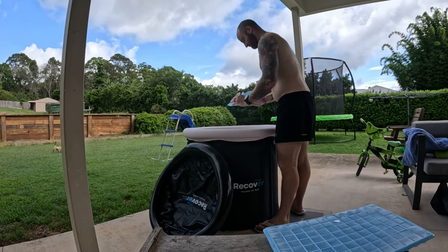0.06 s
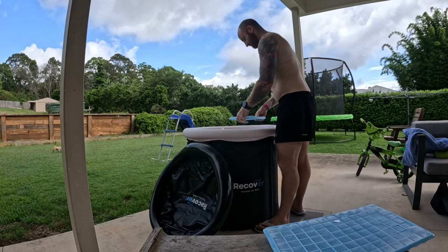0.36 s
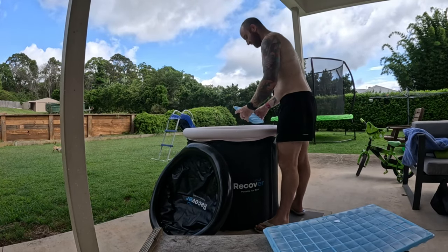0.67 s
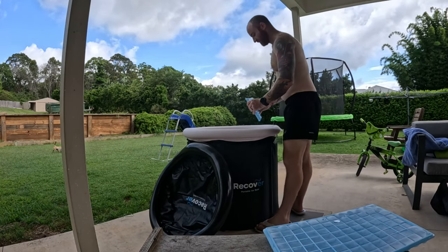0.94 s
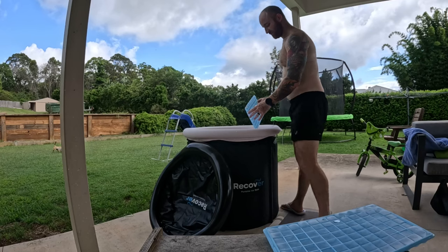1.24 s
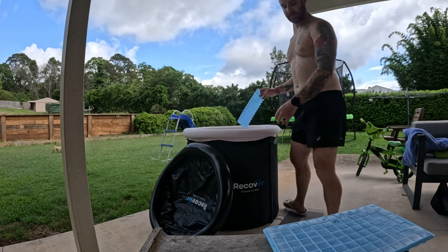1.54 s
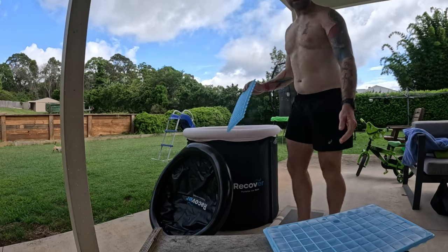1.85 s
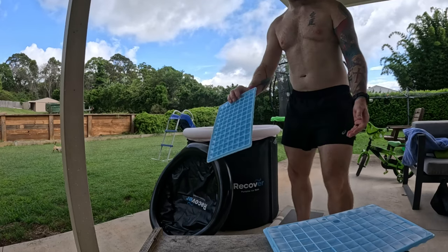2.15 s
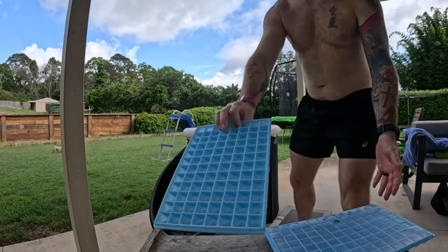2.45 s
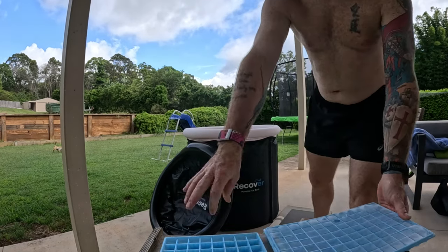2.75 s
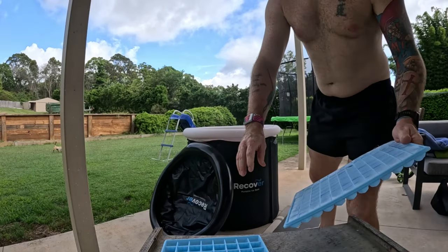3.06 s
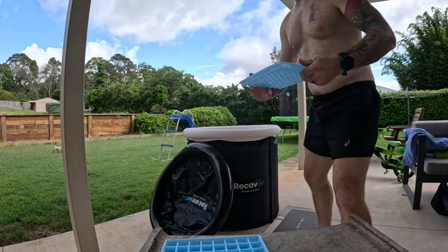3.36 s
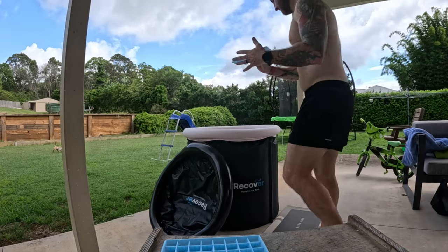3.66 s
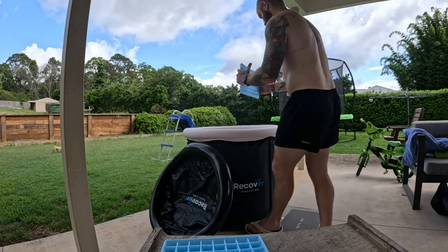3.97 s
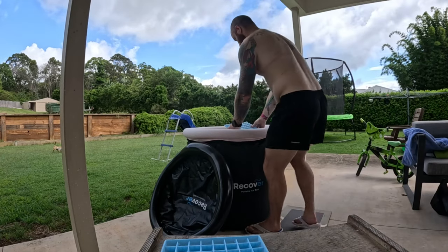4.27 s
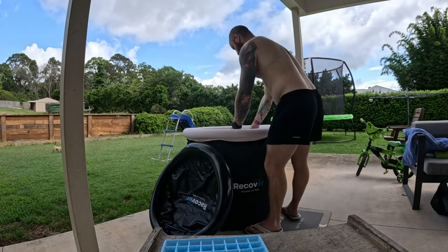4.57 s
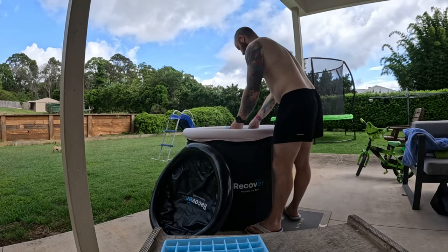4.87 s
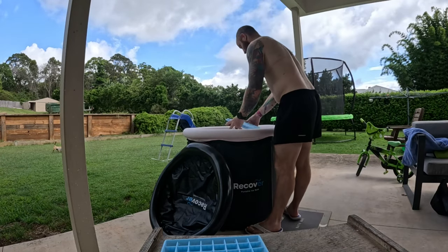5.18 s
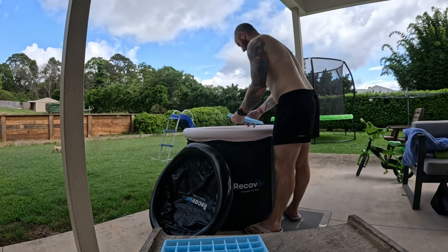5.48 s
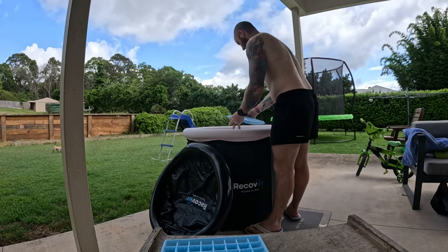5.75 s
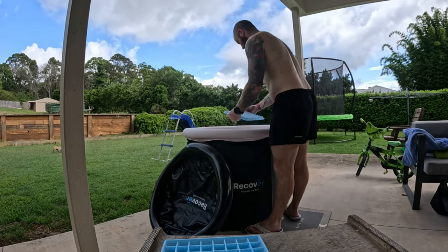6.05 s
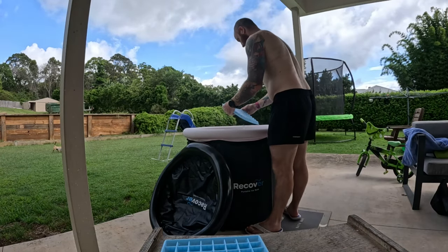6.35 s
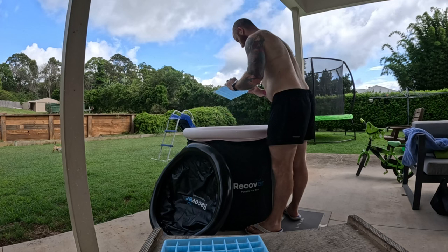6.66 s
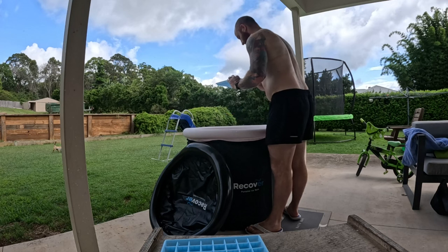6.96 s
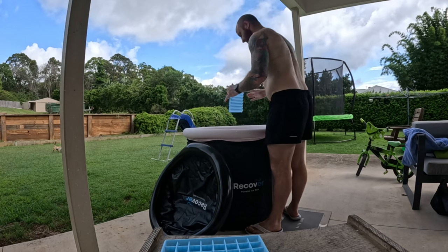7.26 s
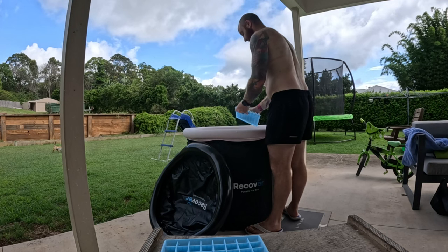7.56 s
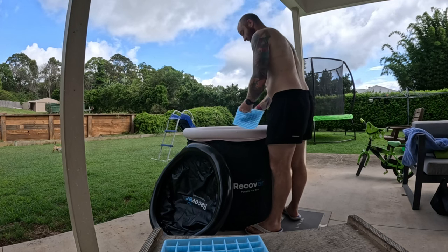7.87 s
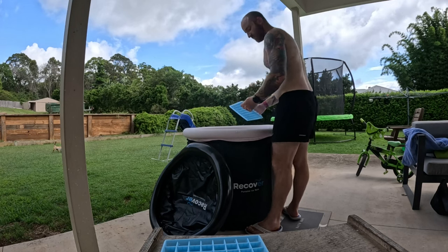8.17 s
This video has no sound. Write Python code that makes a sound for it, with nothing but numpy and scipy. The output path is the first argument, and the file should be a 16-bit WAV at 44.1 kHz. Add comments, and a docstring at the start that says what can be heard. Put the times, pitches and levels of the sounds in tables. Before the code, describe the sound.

Ice cubes crack from flexed trays and splash into a tub, with one loud close tray slap, buzzing cicadas and a single woof.

```python
"""Ice cubes into a tub on the patio

Rubbery trays are twisted until cubes crack loose and splash into a tub of water under a patio roof.
Cicadas buzz in the garden, far engines drone, soft steps pass and a dog woofs once. An empty tray is
slapped on the bench that carries the microphones, and the blow makes their gain control turn
everything down for a moment. Near the end a tray thumps the tub twice."""
import sys
import numpy as np
from scipy import signal
from scipy.fft import rfft, irfft, next_fast_len
from scipy.io import wavfile
from scipy.ndimage import uniform_filter1d

SR = 44100
rng = np.random.default_rng(int(sys.argv[2]) if len(sys.argv) > 2 else 0)


def unload_wav(signal):
    """Save mono or channel-first audio to the path in sys.argv[1] as 16-bit WAV at rate SR, clipped to [-1, 1]."""
    wavfile.write(
        sys.argv[1],
        SR,
        np.round(np.clip(np.atleast_2d(signal).T, -1, 1) * 32767).astype(np.int16),
    )


N = 366912
TIME = np.arange(N) / SR  # seconds into the scene
T = np.arange(32768) / SR  # seconds into one short sound


def amp(db):
    """Turns decibels into a gain."""
    return 10 ** (np.asarray(db) / 20)


def unit_rms(x):
    """Scales a signal to an average power of 1."""
    return x / np.sqrt(np.mean(x ** 2) + 1e-20)


def read(points, hz):
    """Reads between the rows of a frequency table, on a log-frequency axis."""
    f, value = np.transpose(points)
    return np.interp(np.log(hz + 1), np.log(f + 1), value)


def blend(a, b, share):
    """Mixes two sets of settings, from a at share 0 to b at share 1."""
    return [x + (y - x) * np.clip(share, 0, 1) for x, y in zip(a, b)]


def add(mix, s, sound):
    """Mixes a sound in at s seconds."""
    part = mix[max(round(s * SR), 0):][:len(sound)]
    part += sound[:len(part)]


def colour(x, spectrum, bass_db=0, treble_db=0):
    """Filters a sound by a spectrum, with bass and treble controls."""
    size = 2 * next_fast_len(len(x) // 2 + 2048)
    hz = abs(np.fft.fftfreq(size, 1 / SR))
    tilt = [(400, bass_db), (1300, 0), (2000, 0), (6000, treble_db)]
    log_gain = np.log(amp(read(spectrum, hz) + read(tilt, hz)))
    response = np.exp(np.conj(signal.hilbert(log_gain)))[:size // 2 + 1]  # rings only after a hit
    return irfft(rfft(x, size) * response, size)[:len(x)]


def hollowed(spectrum, centre_hz, peak_db, octaves):
    """Adds the hollow note of the struck spot to an object's spectrum."""
    hz = np.geomspace(30, 16000, num=240)
    peak = peak_db / (1 + (np.log2(hz / centre_hz) / octaves) ** 2)
    return np.column_stack([hz, read(spectrum, hz) + peak])


def burst(spectrum, decay, bass_db, treble_db, rise=0.00042, grain_db=3.0):
    """A dying swarm of tiny, uneven hits, coloured by the object they shake."""
    shape = np.minimum(T / rise, 1) * np.exp(-np.maximum(T - rise, 0) / decay)
    hits = rng.standard_normal(len(T)) * amp(grain_db * np.minimum(rng.exponential(1, len(T)), 6))
    heard = T < rise + 10 * decay + 0.05
    sound = unit_rms(colour((hits * shape)[heard], spectrum, bass_db, treble_db))
    sound *= np.sqrt(np.mean(shape[heard] ** 2))
    return np.pad(sound, (0, len(T) - len(sound)))


def ring(notes):
    """The notes of a struck object; each fades by 60 dB in its ring time, t60."""
    tones = sum(amp(db - 60 * T / t60) * np.sin(2 * np.pi * hz * T) for hz, db, t60 in notes)
    return tones * (1 - np.exp(-T / 0.0013))


# echoes off the roof, floor and wall: delay/s, level/dB
ECHOES = [(0.0102, -4), (.0186, -7.5), (.025, -10.5)]
# how long the patio rings: f/Hz, ring time/s
PATIO_RING = [(150, 0.54), (400, 0.4), (900, 0.57), (2000, 0.52), (5000, 0.42), (12000, 0.13)]


def patio(x, echo_db, tail_db, lean_db):
    """Adds hard echoes and a soft tail that differs in each ear; lean_db favours the left."""
    count = len(T) // 16
    taps = np.zeros((2, len(T)))
    places = np.arange(count) * 16 + rng.integers(0, 16, (2, count))
    np.put_along_axis(taps, places, rng.choice([-1., 1.], (2, count)), 1)
    taps = (taps + 0.27 * taps[::-1]) * np.minimum(T / 0.002, 1)
    hz, t, bands = signal.stft(taps, SR, nperseg=256)
    tail = signal.istft(bands * amp(-60 * t / read(PATIO_RING, hz)[:, None]), SR, nperseg=256)[1]
    response = amp(tail_db) * tail / np.linalg.norm(tail[0])
    response[:, 0] += 1  # the direct sound
    for s, db in ECHOES:
        response[:, round(s * SR)] += amp(db + echo_db)
    return signal.oaconvolve(x[None], response, axes=1)[:, :N] * amp([[lean_db / 2], [-lean_db / 2]])


# tone of the garden: f/Hz, level/dB
GARDEN_TONE = [(15, 9.5), (35, -3), (60, 5), (100, -8), (170, -2), (300, -15), (600, -28.5), (1000, -24.5),
               (1500, -21), (2100, -12), (2900, -16), (4000, -10), (6000, -15.5), (7000, -11), (7800, -2.5),
               (9300, -20), (11000, -32), (12200, -29.5), (14500, -51)]
# how alike the two ears are: f/Hz, likeness/0-1
LIKENESS = [(60, 1.0), (150, 0.95), (380, 0.5), (950, 0.54), (2380, 0.63), (5980, 0.83), (15000, 0.34)]
# how much louder the left is: f/Hz, level/dB
LEFT_LEAN = [(60, 0.5), (150, -2), (380, -3), (950, 0.5), (2380, 2.0), (5980, 2.5), (15000, 3.5)]


def garden(level_db=-36, rumble_swing_db=2.5, hiss_swing_db=1.84):
    """A lumpy low rumble and the hiss of many far insects."""
    frames, hz = N // 512 + 5, np.fft.rfftfreq(2048, 1 / SR)
    a, b, c, d, patches = rng.standard_normal((frames, len(hz), 5)).T
    patches = unit_rms(uniform_filter1d(uniform_filter1d(patches, size=16, axis=0), size=10, axis=1))
    alike, left = read(LIKENESS, hz)[:, None], a + 1j * b
    right = alike * left + np.sqrt(1 - alike ** 2) * (c + 1j * d)
    swing_db = read([(100, rumble_swing_db), (500, hiss_swing_db)], hz)[:, None] * patches
    bands = np.array([left, right]) * amp(read(GARDEN_TONE, hz)[:, None] + swing_db)
    bands *= amp(np.outer([0.5, -0.5], read(LEFT_LEAN, hz)))[:, :, None]
    noise = signal.istft(bands, nperseg=2048, noverlap=1536)[1][:, :N]
    return amp(level_db) * unit_rms(noise)


# loudness of the nearest cicada: t/s, level/dB
CICADA_LEVEL = [(0, -42.5), (1.3, -39.5), (3.8, -41), (5.4, -44), (6.3, -38.5), (7.3, -34), (8.32, -38.5)]
# tone of its tymbal, the little drum on its side: f/Hz, level/dB
TYMBAL_TONE = [(5000, -60.5), (6600, -29), (7250, -9), (7720, -4.5), (8050, -9), (8450, -12), (9200, -31),
               (11000, -55)]


def cicada(buzz_hz=85.5, click_gap_s=0.0013, scatter_db=3.3):
    """The little drum buckles twice in each cycle, and every click rings its high note."""
    cycles = np.arange(0, N / SR, 1 / buzz_hz)
    chance, clicks = rng.standard_normal((len(cycles), 4)), np.zeros(N)
    for k in range(2):
        late = k * click_gap_s + 0.00015 * (chance[:, 0] + 0.46 * k * chance[:, 1])
        clicks[np.round((cycles + late) * SR).astype(int) % N] += amp(scatter_db * chance[:, 2 + k])
    song = patio(unit_rms(colour(clicks, TYMBAL_TONE)), echo_db=-15.5, tail_db=-5, lean_db=4.5)
    return amp(np.interp(TIME, *np.transpose(CICADA_LEVEL))) * unit_rms(song)


# one far engine leaving, one arriving:
# start/s, end/s, f/Hz, drift/(Hz/s), level/dB, trend/(dB/s), throb/dB
ENGINES = [(0.1, 3.48, 49.96, -1.15, -36.5, -1.3, -1.5), (5.101, 8.32, 66.44, .7, -49, 1.2, 0.5)]


def engines(throb_hz=0.98, swell_db=3.5, fade_s=0.12):
    """Low drones drift and throb; pitch and level waver on the way through the air."""
    out = np.zeros(N)
    waver, swell = (unit_rms(uniform_filter1d(uniform_filter1d(x, size=3500), size=3500))
                    for x in rng.standard_normal((2, N)))
    for start, end, hz, drift, db, trend, throb_db in ENGINES:
        age = TIME - start
        fade = np.exp(-abs(TIME - np.clip(TIME, start, end)) / fade_s)
        phase = 2 * np.pi * np.cumsum((hz + drift * age) * (1 + 0.01555 * waver)) / SR
        drone = unit_rms(np.sin(phase) + amp(-9) * np.sin(2 * phase) + amp(-20) * np.sin(3 * phase))
        throb = throb_db * np.cos(2 * np.pi * throb_hz * age)
        out += fade * amp(db + trend * age + throb + swell_db * swell) * drone
    return out


# ice and tray snapping: t/s, level/dB, hollow note/Hz, treble/dB
CRACKS = [(.196, -19.5, 2680, -17), (0.523, -18, 2240, -7.5), (.535, -19.5, 2690, 2),
          (1.035, -36, 1840, -3), (1.971, -28.5, 1030, -25), (2.401, -24, 1590, -25),
          (2.418, -28, 1590, -2), (3.181, -22, 1760, 3), (3.399, -34, 3020, -2.5), (4.06, -36.5, 884, -19),
          (4.176, -25.5, 1240, -10), (5.249, -24.5, 1700, -12), (5.342, -24, 4100, -3),
          (5.36, -34, 4150, -2), (5.635, -28.5, 1550, 8), (5.84, -25.5, 2990, 5), (6.194, -28, 2510, 2.5),
          (6.558, -19, 1880, 1)]
# twists of the tray: start/s, end/s, top level/dB, treble/dB
TWISTS = [(0.722, 0.807, -32.5, 6.5), (3.5, 3.643, -38.5, -4.5), (3.933, 4.154, -32, -11),
          (5.837, 5.995, -30.5, 9)]
# tone of a snap: f/Hz, level/dB
CRACK_TONE = [(100, -8), (400, -17.5), (900, -7), (1400, -2.5), (2000, -4), (3300, 1), (5500, -5),
              (9000, -14), (15000, -37.5)]


def ice_cracks(decay_s=0.0054, crackle_hz=2330, spread_octaves=1.8):
    """Cubes snap free as the tray bends; each twist adds eight faint crackles."""
    out, snaps = np.zeros(N), list(CRACKS)
    for start, end, db, treble_db in TWISTS:
        for when, weak, pitch in rng.random((8, 3)):
            hz = crackle_hz * 2 ** (spread_octaves * (pitch - 0.5))
            snaps.append((start + when * (end - start), db - 7 * weak, hz, treble_db))
    for s, db, hz, treble_db in snaps:
        bass_db = 1 - 0.58 * treble_db  # duller snaps have more body
        tone = hollowed(CRACK_TONE, hz, peak_db=7, octaves=0.37)
        add(out, s, amp(db) * burst(tone, decay_s, bass_db, treble_db, grain_db=6))
    return patio(out, echo_db=-2.5, tail_db=-4, lean_db=0)


def bubble(hz, t60, glide=0.15):
    """A pocket of air rings, rising in pitch as it nears the surface."""
    t = T[T < t60]
    return amp(-60 * t / t60) * np.sin(2 * np.pi * hz * t * (1 + glide * t)) * (1 - np.exp(-t / 0.0001))


# single bubbles and clinking cubes: t/s, f/Hz, level/dB, ring time/s
PLINKS = [(1.035, 1940, -25, 0.024), (4.574, 880, -23.5, 0.076), (4.68, 668, -26, 0.15),
          (4.83, 1090, -28.5, 0.21), (5.024, 1925, -21.5, 0.047), (5.182, 918, -36, 0.36),
          (5.246, 1040, -20, 0.045), (5.265, 1140, -24.5, 0.058), (5.579, 946, -41, 0.098),
          (5.343, 4360, -27, .04), (5.362, 4460, -24, 0.031), (6.559, 1920, -22, 0.14)]


def plinks():
    """A lone bubble or a bumped cube rings with one short, clear note."""
    out = np.zeros(N)
    for s, hz, db, t60 in PLINKS:
        add(out, s, amp(db) * bubble(hz, t60))
    return patio(out, echo_db=-7, tail_db=-8, lean_db=0.2)


# footfalls: t/s, level/dB
STEPS = [(1.129, -41.5), (1.249, -37.5), (1.93, -33.5), (2.427, -32)]
# tone of a step: f/Hz, level/dB
STEP_TONE = [(40, -1), (90, 3), (140, -3), (220, -9), (500, -26), (2000, -47)]


def footsteps():
    """Soft soles thud on concrete."""
    out = np.zeros(N)
    for s, db in STEPS:
        add(out, s, amp(db) * burst(STEP_TONE, decay=0.04, bass_db=-13, treble_db=-13, rise=0.024))
    return out


# tone of the dog's throat: f/Hz, level/dB
THROAT_TONE = [(100, -32.5), (220, -11), (390, -3.5), (560, -1.5), (790, -2.7), (1050, 0.4), (1500, -8),
               (1800, -4), (2300, -31), (2900, -22.5), (4500, -57)]
# notes the patio holds after the woof: f/Hz, width/Hz, level/dB
WOOF_RING = [(790, 6, 4), (1030, 7, 0), (1190, 8, 0)]


def dog(start_s=1.476, length_s=0.19, rise_s=0.062, hold_s=0.061, level_db=-23.5):
    """Rough throat pulses rise and fall in pitch; the opening mouth lets the treble out."""
    t = np.clip(TIME - start_s, 0, length_s)
    fall_db = 158 * np.maximum(t - rise_s - hold_s, 0)
    effort = np.minimum(t / rise_s, 1) ** 1.6 * amp(level_db - fall_db) * (t < length_s)
    arch = abs(np.sin(np.pi * (t / length_s) ** 0.9)) ** 2.2
    hz, rough = blend((195, 0.15), (420, 0.6), arch)  # highest and roughest mid-woof
    jitter = unit_rms(uniform_filter1d(rng.standard_normal(N), 120))
    cycles = np.cumsum(hz * (1 + 0.05 * jitter)) / SR
    buzz = sum(np.cos(2 * np.pi * k * cycles) / k ** 0.96 for k in range(1, 10))
    puffs = (0.24 + np.exp(-(cycles % 1) / 0.087)) * rng.standard_normal(N)
    wide = (1 - rough) * unit_rms(colour(buzz, THROAT_TONE)) + rough * unit_rms(colour(puffs, THROAT_TONE))
    shut = signal.sosfilt(signal.butter(2, 450, fs=SR, output="sos"), wide)
    mouth = np.minimum(t / 0.081, 1) ** 2
    voice = shut + mouth * (wide - shut)
    voice *= effort / np.sqrt(abs(uniform_filter1d(voice ** 2, 900)) + 1e-9)  # effort alone sets level
    held = sum(amp(db) * signal.lfilter(*signal.iirpeak(note, note / width, fs=SR), voice)
               for note, width, db in WOOF_RING)
    return patio(voice + held, echo_db=-7, tail_db=0, lean_db=0)


# the tray hitting the bench:
# t/s, level/dB, flatness (0 edge, 1 face), hollow note/Hz, treble/dB, top boom/dB, frame ring/dB
KNOCKS = [(2.659, -6, 0.82, 450, 25.5, -22.5, -45), (2.674, -9.5, 0.81, 354, 0, -11.5, -42),
          (2.7433, -3, 0.84, 635, -20, -25, -37.5), (2.76, -8.5, 1, 950, 2, -18, -32.5),
          (2.779, -17, 1, 770, -19, -37, -34.5), (2.812, -9.5, .65, 1270, -7, -48.5, -28),
          (2.845, 23.5, 0.0084, 1350, 1, 7.5, 4.5), (2.853, 10.5, 0.5, 970, -1, -3, 3.5),
          (2.917, 4.5, 0.13, 1210, -14, -22, -17), (2.953, 8, 0.38, 1090, -12, -11, -20),
          (2.9622, 5.5, .1, 1400, -6, -35, -30), (2.999, -12, 0.068, 1310, -11, -12, -17),
          (3.013, -4.5, .7, 1100, -0.5, -33, -38), (3.059, -17, 0.94, 1240, 15, -20.5, -32.5)]
# notes of the bench top: f/Hz, level/dB, ring time/s
BENCH_TOP = [(134.1, -0.5, 0.41), (182, -2, 0.28), (153.7, -1.5, 0.21), (99, -1, 0.21), (327, -5, 0.15)]
# notes of its frame: f/Hz, level/dB, ring time/s
BENCH_FRAME = [(522, -8, 0.18), (560, -17.5, 0.16), (959, 0, 0.3), (987, -0.5, 0.27), (1220, -23.5, 0.18),
               (1440, -15.5, 0.06), (1450, -29.5, 0.23), (1550, -17, 0.27), (1970, -34, 0.2)]
# tone of a clack: f/Hz, level/dB
CLACK_TONE = [(40, -5), (150, 10.5), (450, 3), (1000, 3), (1700, -3), (2600, -10.5), (3900, -11),
              (5200, -26), (9000, -39), (12500, -42.5), (15000, -77)]


def tray_on_bench():
    """The tray lands flat and dull, then its edges clack; the top booms and the frame rings."""
    out, top, frame = np.zeros(N), ring(BENCH_TOP), ring(BENCH_FRAME)
    on_edge, on_face = (0.0021, -23.5), (0.0105, 6)  # decay/s, bass/dB
    for s, db, flatness, hz, treble_db, boom_db, ring_db in KNOCKS:
        decay, bass_db = blend(on_edge, on_face, flatness)
        tone = hollowed(CLACK_TONE, hz, peak_db=7, octaves=0.33)
        clack = burst(tone, decay, bass_db, treble_db, grain_db=4.5)
        note = ring([(hz, -14.5, 0.025)])
        add(out, s, amp(db) * (clack + note) + amp(boom_db) * top + amp(ring_db) * frame)
    return patio(out, echo_db=-22, tail_db=-16, lean_db=-1.5)


def bubble_cloud(rise, decay, bass_db, count=110, ring_cycles=38):
    """A dying cloud of bubbles of all sizes; more bass favours the big ones."""
    cloud = np.zeros(len(T))
    for when, pitch, weak in rng.random((count, 3)):
        late, hz = 2.9 * decay * when, 420 * 15 ** pitch
        db = bass_db * (1 - pitch) - 14 * weak - 22 * when
        add(cloud, rise + late, amp(db) * bubble(hz, ring_cycles / hz, glide=3.4))
    return unit_rms(cloud) * np.sqrt(decay / 2 / T[-1])


# ice dropping in and water sloshing: t/s, level/dB, rise/s, decay/s, depth (0 skims, 1 plunges)
SPLASHES = [(4.32, -16, 0.0018, .014, .3), (4.331, -16, 0.0051, 0.031, 0.27),
            (4.386, -24.5, 0.0088, .07, 0.45), (4.512, -21.5, 0.018, 0.062, 0.076),
            (4.57, -31.5, .011, 0.078, 0.81), (4.662, -24.5, 0.025, 0.038, 0.71),
            (4.765, -24, 0.016, 0.061, 0.28), (4.815, -30, 0.0095, 0.082, 0.44),
            (5.021, -30.5, 0.0069, 0.022, 0.013), (5.106, -26.5, 0.015, 0.026, 0.1),
            (5.171, -33.5, 0.041, 0.058, 0.55), (5.241, -32, 0.012, 0.018, 0.88),
            (5.521, -38.5, 0.0093, 0.045, 0.9), (5.63, -39, 0.02, 0.057, 0.57),
            (5.846, -41, 0.018, 0.058, 0)]
# tone of the spray: f/Hz, level/dB
SPRAY_TONE = [(100, -13), (250, 4), (450, -6), (850, -7.5), (1500, -7.5), (3500, -4), (6500, -7),
              (9000, -14), (13000, -27.5), (15000, -44)]


def splashes():
    """Each splash throws spray and leaves bubbles; the deeper the plunge, the darker it sounds."""
    out = np.zeros(N)
    skim, plunge = (-45.5, 1.6), (3.2, -11)  # bass/dB, treble/dB
    for s, db, rise, decay, depth in SPLASHES:
        bass_db, treble_db = blend(skim, plunge, depth)
        spray = burst(SPRAY_TONE, decay, bass_db, treble_db, rise, grain_db=4)
        add(out, s, amp(db) * (spray + amp(-3) * bubble_cloud(rise, decay, bass_db)))
    return patio(out, echo_db=-7, tail_db=-8, lean_db=0.2)


# the tray hitting the tub: t/s, level/dB, decay/s, hollow note/Hz, bass/dB, treble/dB, wall boom/dB
THUMPS = [(7.658, -15, 0.013, 1440, 11, 4.5, -47), (7.67, -10, .013, 757, 10, -8, -19.5),
          (7.927, -19, 0.012, 920, 2, 14, -21.5), (7.941, -12, 0.007, 324, 5, -11, -11)]
# tone of a thump: f/Hz, level/dB
THUMP_TONE = [(30, -16), (180, -13.5), (400, -12), (680, -19.5), (1020, -1.5), (1500, -12.5), (2000, -15.5),
              (3300, -19), (6000, -32.5), (10000, -37), (15000, -55)]
# notes of the tub wall: f/Hz, level/dB, ring time/s
TUB_WALL = [(112, -5.5, 0.056), (214, 6, 0.065), (264, -1, 0.082), (298, -13.5, 0.3), (378.4, -7, 0.12),
            (944, -18, 0.39), (1160, -38, 0.17), (1510, -20, 0.18)]


def tray_on_tub():
    """The tray slaps dully on the padded tub, whose wall booms briefly."""
    out, wall = np.zeros(N), ring(TUB_WALL)
    for s, db, decay, hz, bass_db, treble_db, boom_db in THUMPS:
        slap = burst(hollowed(THUMP_TONE, hz, peak_db=10, octaves=0.17), decay, bass_db, treble_db)
        add(out, s, amp(db) * slap + amp(boom_db) * wall)
    return patio(out, echo_db=-10.5, tail_db=-10, lean_db=0.6)


def scene():
    """Everything that reaches the microphones."""
    return (garden() + cicada() + engines() + ice_cracks() + plinks() + footsteps() + dog()
            + tray_on_bench() + splashes() + tray_on_tub())


def record(dry, limit_db=-8, fast_db_per_s=115, slow_db_per_s=11, top_hz=15700):
    """Loud blows turn the gain down; it comes back fast, then slowly. Peaks clip; top treble is cut."""
    # dull booms trip the gain control less than sharp clacks
    sensed = signal.sosfilt(signal.butter(2, 800, "highpass", fs=SR, output="sos"), dry)
    power_db = 10 * np.log10(abs(uniform_filter1d((sensed ** 2).mean(0), size=130)) + 1e-12)
    over_db = np.maximum(power_db - limit_db, 0)
    fast = np.maximum.accumulate(over_db + fast_db_per_s * TIME) - fast_db_per_s * TIME
    slow = np.maximum.accumulate(0.5 * over_db + slow_db_per_s * TIME) - slow_db_per_s * TIME
    cut_db = uniform_filter1d(np.maximum(fast, slow), size=60)
    ducked = np.clip(dry / amp(cut_db), -1, 1)
    lowpass = signal.firwin(511, top_hz, window=("kaiser", 9), fs=SR)
    return signal.oaconvolve(ducked, lowpass[None], "same")


dry = scene()
out = record(dry)
unload_wav(out)
```